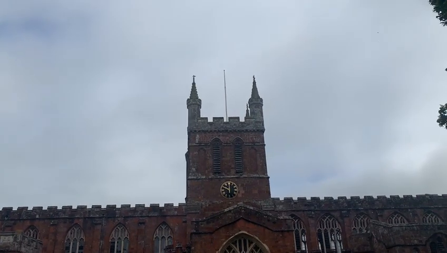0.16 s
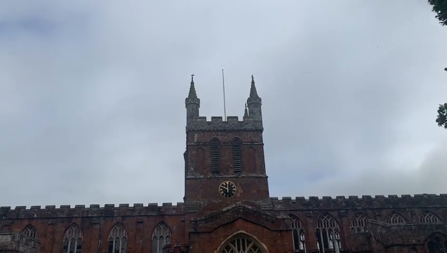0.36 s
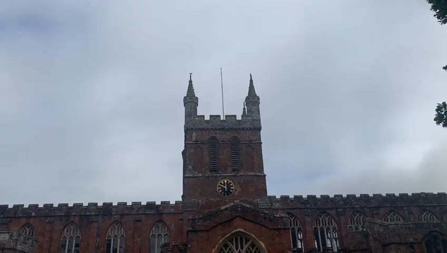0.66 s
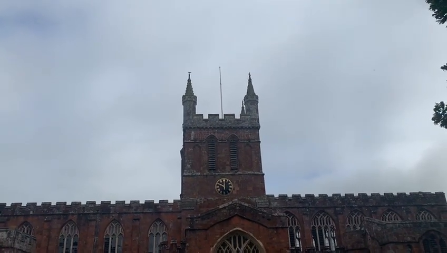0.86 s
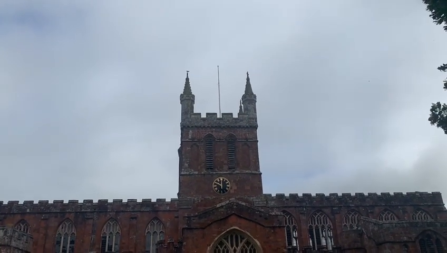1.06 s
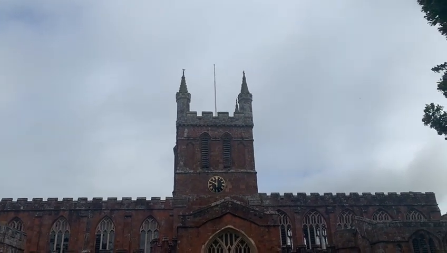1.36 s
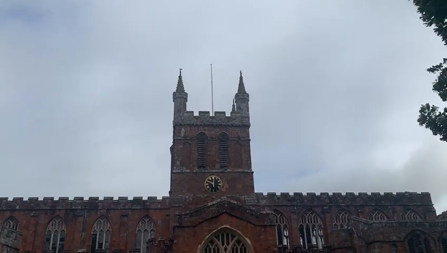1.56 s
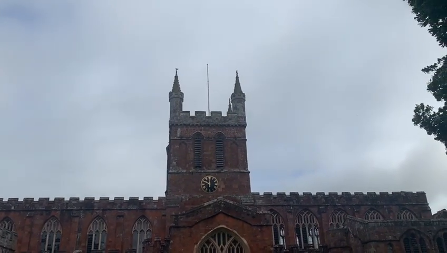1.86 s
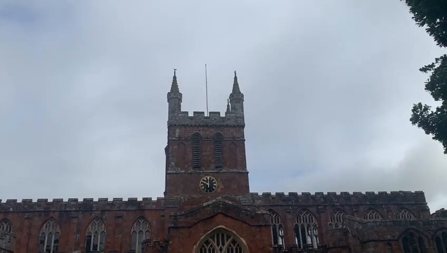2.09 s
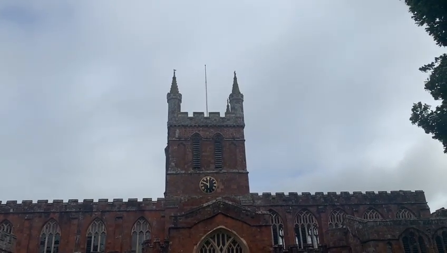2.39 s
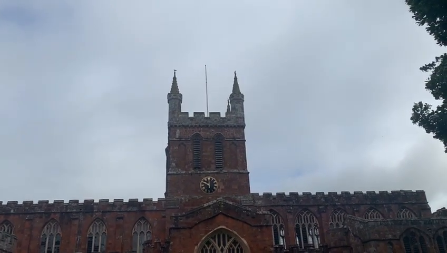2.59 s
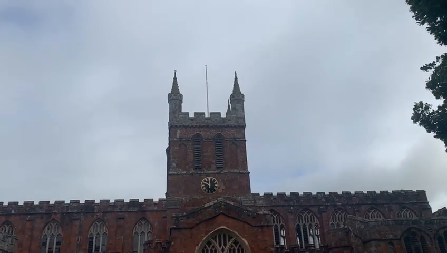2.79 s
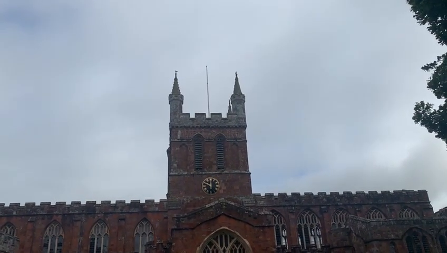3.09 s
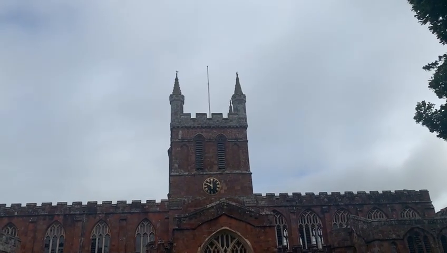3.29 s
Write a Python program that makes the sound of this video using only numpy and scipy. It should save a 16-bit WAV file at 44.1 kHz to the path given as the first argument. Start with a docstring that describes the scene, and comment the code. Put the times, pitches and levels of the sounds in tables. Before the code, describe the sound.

A large church bell is already ringing at the start, fades slowly, then is struck again around two seconds; distant road rumble underneath, heard outdoors in stereo from the churchyard below, with two tiny bird chips.

```python
"""A churchyard under a high stone tower: its large clock bell is struck twice, the first blow just before the start.
The bell is close pairs of decaying sines that beat slowly, plus a brief clang of minor modes; echoes soften the attack.
Shaped noise gives a distant road's engines and tyres and a faint hiss on top; low throbs mark the engines' surges.
A thin whistle of narrow noise rises twice in the treble, and a small bird chips twice in quick falling sweeps."""
import sys
import numpy as np
from scipy import signal
from scipy.fft import rfft, irfft
from scipy.io import wavfile
from scipy.ndimage import uniform_filter1d

SR = 44100
rng = np.random.default_rng(int(sys.argv[2]) if len(sys.argv) > 2 else 0)


def generate_wav(sig):
    """Save sig (samples, or channels by samples) to the path in sys.argv[1] as 16-bit PCM at SR."""
    pcm = np.round(np.clip(np.atleast_2d(sig).T, -1, 1) * 32767).astype(np.int16)
    wavfile.write(sys.argv[1], SR, pcm)


N = 151704

# Moments when the clapper strikes. Each entry: time in seconds.
BLOWS_S = [-.17, 1.984]
SHADOW_HZ = 700  # the direct path loses treble above this; the bell's shimmer is also scaled from it


def undb(db):
    """Turn decibels into an amplitude factor."""
    return 10 ** (np.asarray(db) / 20)


def level(x, db):
    """Scale a signal to an RMS level in dB."""
    return x * undb(db) / np.sqrt(np.mean(x ** 2))


def smooth(x, size):
    """Average twice over a span of samples, which leaves a soft low-pass."""
    return uniform_filter1d(uniform_filter1d(x, size), size)


def walk(rate):
    """Random levels held for 1 / rate seconds and slewed twice; spread near 1."""
    hold = int(SR / rate)
    held = np.repeat(rng.standard_normal(N // 500), hold)[:N]
    return 1.3 * smooth(held, hold)


def on_log(table, hz, axis):
    """Read one column of a table on a log-frequency axis."""
    table = np.array(table)
    return np.interp(np.log(np.maximum(hz, 1)), np.log(table[:, 0]), table[:, axis])


def step(u):
    """A quick exponential rise from 0 to 1."""
    build_up_s = .015
    return 1 - np.exp(-np.maximum(u, 0) / build_up_s)


def arrival(u, hz):
    """A blow comes straight from the tower, whose louvres shade the treble, then off near and far buildings."""
    direct_share, echo_s, late_echo_s = .65, .04, .09
    direct = direct_share * min(1, SHADOW_HZ / hz)
    late = (direct_share - direct) / 2
    near = 1 - direct - late
    return direct * step(u) + near * step(u - echo_s) + late * step(u - late_echo_s)


def bell(t):
    """Each partial is a pair of decaying sines, slightly apart in pitch, whose sum beats."""
    # The bell's partials and the tuning of their twins. Each row: pitch in Hz, twin's offset in Hz,
    # twin's phase lead in turns after blow 1, the same after blow 2, left's lead over right in turns.
    partials = [(294.33, .4, .1, .1, 0), (354.2, .6, .15, .4, -.04), (589.7, .3, -.18, 0, -.1),
                (625, 9, .2, .2, 0), (772.87, .5, .4, .4, .05), (877.8, .5, .35, .37, .07),
                (1106.5, .4, .4, .4, 0), (1208.3, 1.2, -.27, -.22, .16), (1340.2, -2, .16, .17, .08),
                (1400.2, .8, .1, .1, .09), (1573.8, 1.3, .39, .34, .14), (1967.2, 1.4, .28, .35, .23),
                (2066.4, .5, .3, .3, .2), (2282, 2.5, -.05, -.4, .16), (2381.5, .7, .42, .48, .2),
                (2698, .6, .3, .3, .2), (2810.7, .9, -.22, -.3, .3), (3029.7, 4, .3, .3, .3),
                (3248.9, .4, .4, .4, .3), (3701, 3, .4, .4, .3), (4323, 4, .3, .3, .35),
                (4616.5, 5, .4, .4, .35), (359, 7, .1, .1, 0), (886, 11, .1, .1, .07),
                (4156, .5, .2, .2, .35)]
    # Strength and decay of those partials, row for row. Each row: starting level in dB for blow 1, for blow 2
    # (before shimmer and echoes), time to fall 60 dB in seconds, left over right in dB; then the same for the twin.
    ring_rows = [(-34.5, -73.5, 20.6, -1.5, -51.5, -86, 19, 2), (-40, -40, 11.8, 0.5, -48, -54, 7.4, 3),
                 (-27.5, -27.5, 4.57, -5, -40, -42.5, 2.24, -1), (-54, -29.5, .5, -2, -52.5, -50, .5, -8),
                 (-54, -56.5, 14, -4.5, -77, -60, 12, -7), (-42.5, -45, 9.4, -4, -37, -39, 8.4, -5),
                 (-49, -46, 1.8, -3, -58, -56, 1.8, -3), (-39.5, -33.5, 7, 1, -44, -41.5, 7, -1.5),
                 (-48, -47.5, 3.5, -2.5, -55, -58, 3.5, 2), (-44.5, -46.5, 2.5, -2.5, -66, -64, 7, 1),
                 (-43.5, -41, 7, -2.5, -45, -46.5, 2.5, 3), (-44.5, -40.5, 5, -2, -39, -40, 3.5, -4),
                 (-63, -54, 2.1, -6.5, -64, -56, 2.1, -6.5), (-52, -52, 5, -1, -56, -52, 1.5, 0),
                 (-42, -39, 3.8, -5, -38.5, -40, 3.8, -1.5), (-64, -69, 2.4, -4, -65, -68, 3.9, -1),
                 (-53, -55.5, 6, 0.5, -54, -54.5, 2.9, 0), (-63, -60.5, 1.6, -1, -70.5, -72, 1.6, -1.5),
                 (-55, -52, 3.6, 3.5, -68.5, -58, 3.5, 2.5), (-46.5, -61, 0.87, 2, -67.5, -65, 1.5, 5.5),
                 (-57.5, -64, 4, -1, -65, -67, 2.9, -3), (-68, -60, 1.7, -8.5, -67.5, -63, 1.2, -7),
                 (-40.5, -36.5, 0.61, 0.5, -43.5, -40, 0.44, -2.5),
                 (-46, -33.5, 0.98, -5.5, -57.5, -50.5, .5, -4),
                 (-62.5, -67.5, 0.92, 6, -81.5, -74.5, 2.1, 1)]
    shimmer_db = .9  # at SHADOW_HZ, growing with the root of frequency
    old_ring_lingers_s = .07

    out = np.zeros((2, N))
    since = [np.maximum(t - s, 0) for s in BLOWS_S]
    sides = np.array([[.5], [-.5]])  # left, right
    for (hz, split_hz, *turns, lead), row in zip(partials, ring_rows):
        # a blow adds to or cancels what still rings, so each partial starts afresh after each blow
        old_ring = 1 - step(since[1] - old_ring_lingers_s)
        shares = [old_ring, arrival(since[1], hz)]
        shimmer = undb(shimmer_db * np.sqrt(hz / SHADOW_HZ) * walk(12))
        placed = shimmer * np.exp(2j * np.pi * lead * sides)
        for blow, start in enumerate(rng.random(2)):
            u = since[blow]
            pair = ((hz, 0, row[:4]), (hz + split_hz, turns[blow], row[4:]))
            for f, turn, (*db, t60, pan_db) in pair:
                decay = undb(db[blow] - 60 * u / t60)
                ring = shares[blow] * decay * np.exp(2j * np.pi * (f * u + start + turn))
                out += np.imag(undb(pan_db * sides) * placed * ring)
    return out


def clang(t):
    """Many minor modes, scattered in pitch, strength and length of ring, sound briefly after each blow."""
    # Tone colour of the clang. Each row: frequency in Hz, relative level of a minor mode in dB.
    colour = [(300, -2), (900, -1), (2000, -3), (3500, -11), (6000, -23), (8000, -34)]
    modes, low_hz, top_hz = 130, 300, 7500
    clang_db, rise_s = -46, .04
    t60_s = .3  # scattered from .5 to 2.5 times this

    place, size, length, turn, across = rng.random((modes, 5)).T[:, :, None]
    hz = low_hz * (top_hz / low_hz) ** place
    gain = undb(clang_db + on_log(colour, hz, axis=1) - 10 * size)
    mode_t60 = t60_s * (.5 + 2 * length ** 2)
    out = np.zeros((2, N))
    for s in BLOWS_S:
        u = t[(t >= s) & (t < s + 1)] - s
        rise = 1 - np.exp(-(u / rise_s) ** 2)
        fade = gain * rise * undb(-60 * u / mode_t60)
        first = max(int(np.ceil(s * SR)), 0)
        for side in range(2):
            # the right ear hears each mode at its own shifted phase
            tones = np.sin(2 * np.pi * (hz * u + turn + side * across / 2))
            out[side, first:first + len(u)] += (fade * tones).sum(axis=0)
    return out


def road_and_hiss(t):
    """Half-octave noise bands: four regions swell on their own and the level of each band wanders at random."""
    # Spectrum of the noise: road below about 8 kHz, faint hiss near 11 kHz. Each row: frequency in Hz,
    # relative density in dB per Hz, likeness of left and right from 0 to 1.
    spectrum = [(20.3, -27, 0.94), (37.4, -20.5, 0.84), (49.4, 1, 1), (58.6, -7, 0.88), (69, 4.5, 1),
                (70.5, -8.5, 0.97), (97.2, -5.5, 0.98), (142.6, -12.5, 0.85), (144.8, -3, 1),
                (160, -12.5, .85), (187.7, -4, 0.65), (221, -12, 0.91), (240, -8.5, 0.6), (262.3, -14.5, 1),
                (329, -20.5, 0.5), (494, -26, 0.48), (960, -20.5, 0.58), (1900, -29.5, 0.23),
                (2730, -39.5, 0.5), (3460, -42, 0), (4910, -50, 0), (6220, -48.5, 0.2), (6890, -58, 0),
                (8870, -76, 1), (10830, -64.5, 0.5), (12800, -84.5, 0.09)]
    # Swells of the noise. Each row: time in seconds, then relative levels in dB
    # of the engine rumble, the drone, the tyre roar and the treble.
    swell_rows = [(0, 3, -3, 4.5, 5.5), (.3, -1.5, 0.5, 2, 1.5), (.72, 0.5, 0, 3.5, 2.5),
                  (0.821, -2, 0, 3, 3.5), (1.15, -2.5, 0, 4, 1), (1.38, -5.5, -0.5, 3.5, 1.5),
                  (1.599, -1, 0, 2, 3.5), (1.9, 1.5, 0, 1.5, -0.5), (2.2, -2, 0.5, 3, 4.5),
                  (2.45, -3.5, -1, 1, -4), (2.799, -2, 0, 1.5, -3.5), (3.1, -2, -1.5, 0, -4.5),
                  (3.44, -6.5, -4.5, 1.5, -5.5)]
    noise_db = -32
    lag_s, lag_from_hz = .0003976, 590  # left hears the noise later; the full lag holds from this frequency up
    rumble_top_hz, drone_top_hz, treble_from_hz = 100, 300, 5000
    rumble_wander_db, upper_wander_db = 2.0, 1.2

    hz = np.arange(N // 2 + 1) * SR / N
    like = np.clip(on_log(spectrum, hz, axis=2), 0, 1)
    mid, side = rfft(rng.standard_normal((2, N))) * undb(on_log(spectrum, hz, axis=1))
    both = mid * np.sqrt(1 + like) + side * np.sqrt(1 - like) * np.array([[1], [-1]])
    lag = lag_s * np.clip(hz / lag_from_hz, 0, 1) ** 2
    both[0] *= np.exp(-2j * np.pi * hz * lag)

    rows = np.array(swell_rows)
    swells = [np.interp(t, rows[:, 0], column) for column in rows[:, 1:].T]
    out = 0
    for centre in np.arange(4, 14.1, .5):  # octaves above 1 Hz
        window = np.clip(1 - 2 * np.abs(np.log2(hz + 1) - centre), 0, 1)
        band = irfft(both * window, N)
        region = np.searchsorted([rumble_top_hz, drone_top_hz, treble_from_hz], 2 ** centre)
        db = swells[region] + (upper_wander_db if region else rumble_wander_db) * walk(9)
        out = out + band * undb(db)
    return level(out, noise_db)


def whistles(t):
    """Smoothed noise rides on a climbing sine and cosine: a narrow band that swells, climbs and fades."""
    # The two whistles. Each row: start in seconds, length in seconds, first pitch in Hz, last pitch in Hz,
    # level in dB before the swell.
    whistle_rows = [(.15, .8, 5900, 6700, -71), (1.45, .6, 6000, 6500, -68)]
    width_hz = 700  # its inverse is the averaging span of the noise

    out = np.zeros((2, N))
    size = int(SR / width_hz)
    for s, length, from_hz, to_hz, db in whistle_rows:
        part = np.clip((t - s) / length, 0, 1)
        rough = smooth(rng.standard_normal((2, 2, N)), size)
        turn = 2 * np.pi * np.cumsum(from_hz + (to_hz - from_hz) * part) / SR
        tone = level(rough[0] * np.sin(turn) + rough[1] * np.cos(turn), db)
        swell = np.sqrt(np.sin(np.pi * part).clip(0))
        out += tone * swell
    return out


def surges(t):
    """The rumble surges in short, low sine throbs that sag in pitch, alike left and right."""
    # Surges of the engines. Each row: centre in seconds, length in seconds, mid pitch in Hz, peak level in dB.
    surge_rows = [(.26, .1, 71, -28.5), (.42, 0.13, 66, -28), (.555, 0.13, 63.6, -29.5),
                  (0.683, 0.082, 61, -28.5), (1.322, 0.057, 55.3, -26), (1.395, 0.045, 84, -23),
                  (2.15, .1, 63.6, -35), (2.546, 0.082, 59.5, -30.5), (3.268, 0.087, 58.4, -31)]
    sag = .12

    out = np.zeros(N)
    for (s, length, hz, db), turn in zip(surge_rows, rng.random(len(surge_rows))):
        part = np.clip((t - s) / length, -.5, .5)
        swell = np.cos(np.pi * part) ** 2
        cycles = turn + hz * length * part * (1 - sag * part)
        out += undb(db) * swell * np.sin(2 * np.pi * cycles)
    return out


def bird(t):
    """Each chip is one quick, falling sine sweep, roughened by noise, with a close echo."""
    # The bird's two chips. Each row: start in seconds, sweep level in dB before roughening and echo.
    chips = [(2.413, -56.5), (2.689, -54)]
    chip_s, from_hz, to_hz = .017, 5900, 3700
    echo_s, echo_db = .004, -5
    roughness = .6  # against a steady gain of 2

    out = np.zeros(N)
    noise = smooth(rng.standard_normal(N), 60)
    for s, db in chips:
        part = np.clip((t - s) / chip_s, 0, 1)
        hz = from_hz + (to_hz - from_hz) * part
        swell = np.sin(np.pi * part) ** 2
        out += undb(db) * swell * np.sin(2 * np.pi * np.cumsum(hz) / SR)
    out = out * (2.0 + roughness * level(noise, 0))
    echo = undb(echo_db) * np.roll(out, int(echo_s * SR))
    # the chip leans left, its echo right
    return np.array([out + echo / 2, out / 2 + echo])


def scene():
    """Sum the bell, the road with its hiss and the small treble sounds in stereo."""
    t = np.arange(N) / SR
    return bell(t) + clang(t) + road_and_hiss(t) + whistles(t) + surges(t) + bird(t)


def record(dry):
    """A steep elliptic low-pass cuts the top."""
    top_hz = 11700
    return signal.sosfilt(signal.ellip(8, .2, 70, top_hz, fs=SR, output="sos"), dry)


dry = scene()
out = record(dry)
generate_wav(out)
```